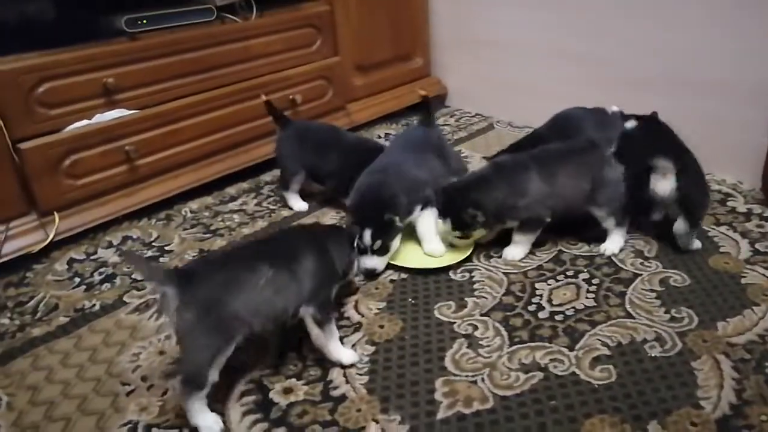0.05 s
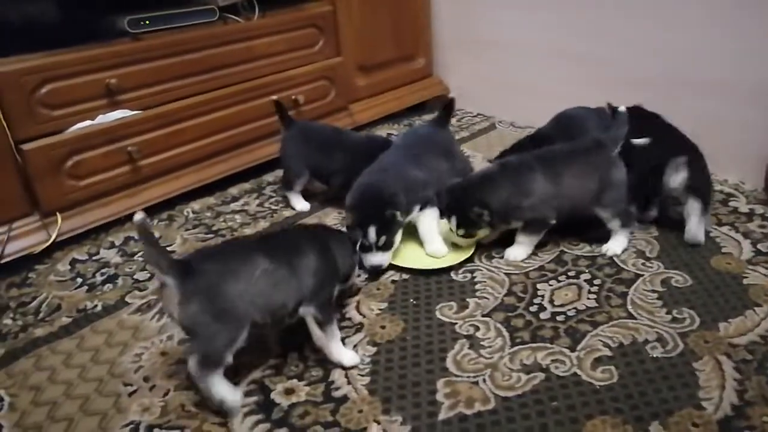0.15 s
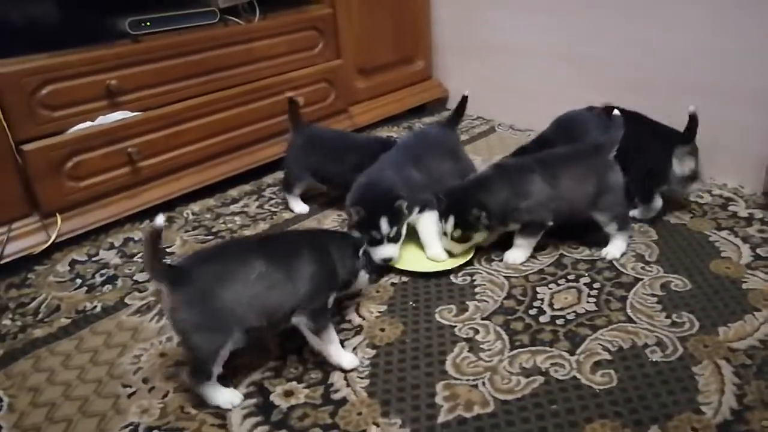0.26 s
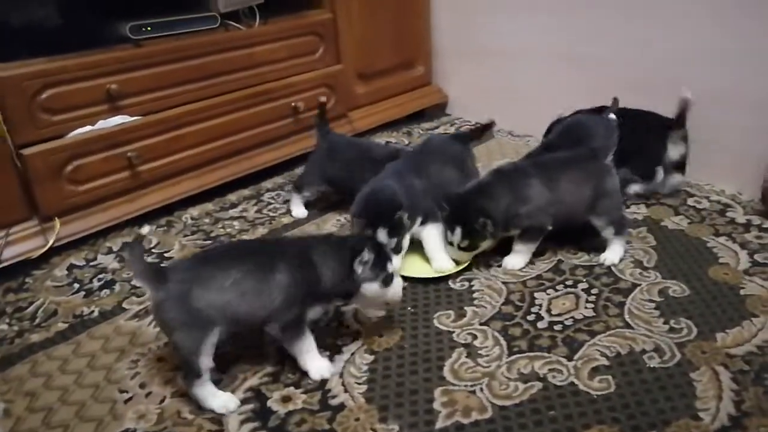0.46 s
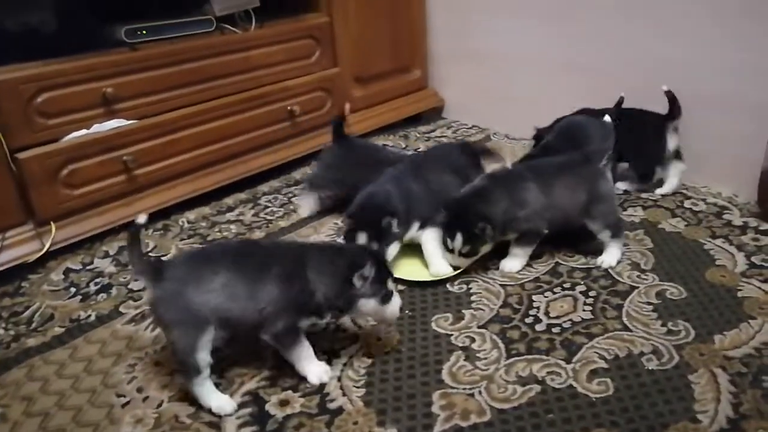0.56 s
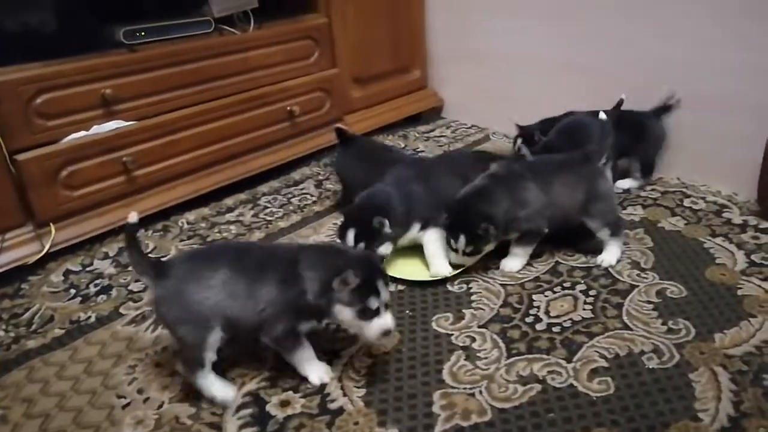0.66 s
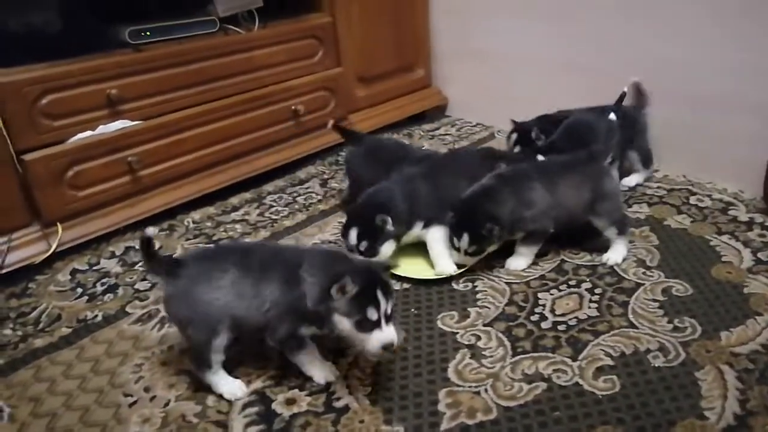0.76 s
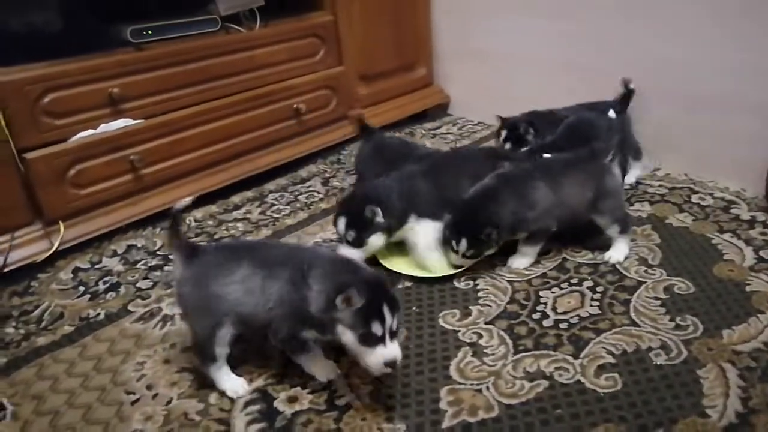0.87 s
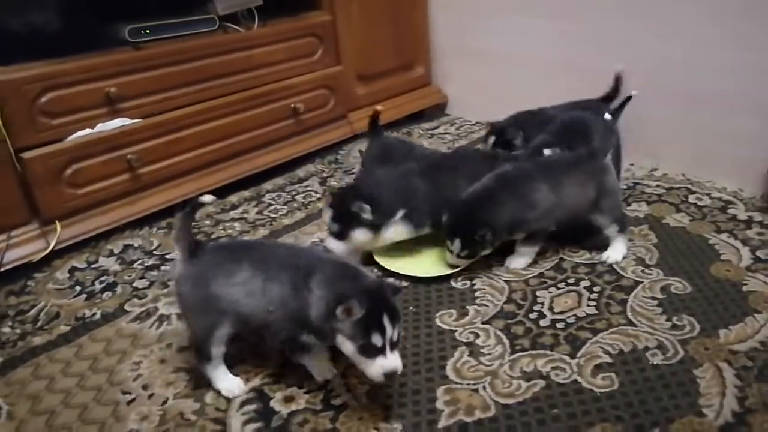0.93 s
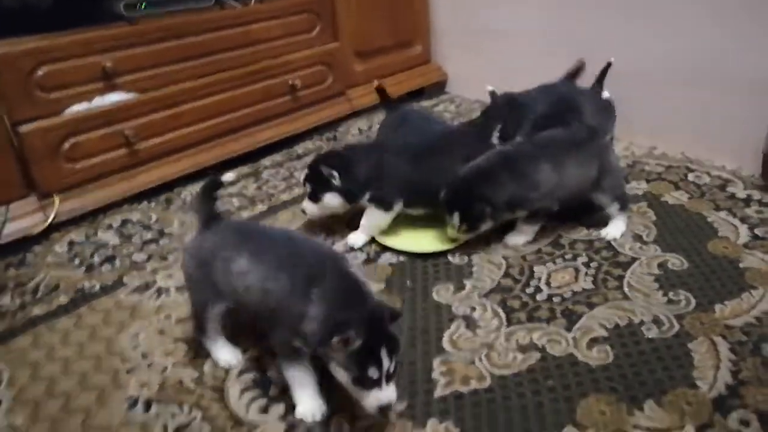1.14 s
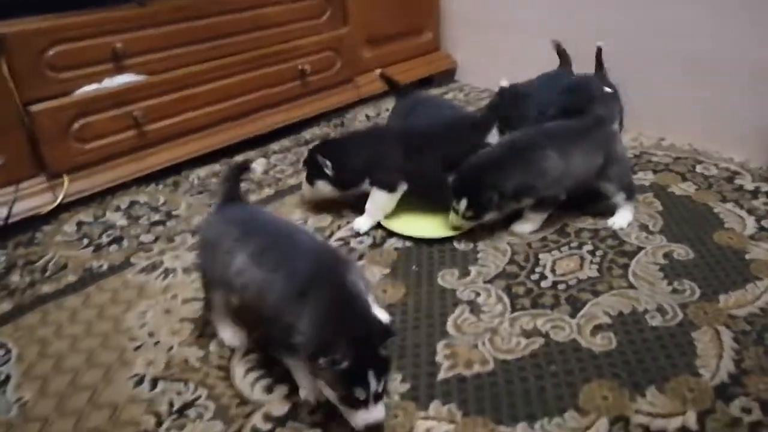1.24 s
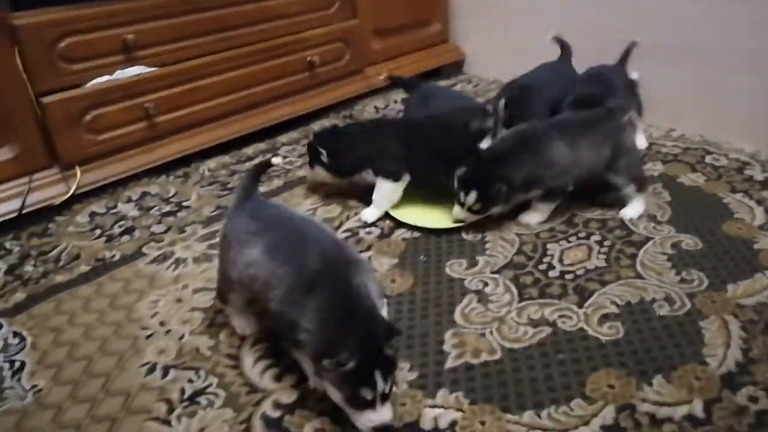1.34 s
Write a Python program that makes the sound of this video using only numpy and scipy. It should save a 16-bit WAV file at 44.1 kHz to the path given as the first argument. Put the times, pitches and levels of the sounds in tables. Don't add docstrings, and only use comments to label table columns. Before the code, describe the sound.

Several young puppies yap and whine close by in a small room: a quick rising yip, a loud shrill yap, another hoarse pair, then faint whimpers, with soft paw thumps and carpet scuffs over low hum.

```python
import sys
import numpy as np
from scipy import signal
from scipy.fft import rfft, irfft
from scipy.io import wavfile
from scipy.ndimage import uniform_filter1d, map_coordinates

SR = 44100
rng = np.random.default_rng(int(sys.argv[2]) if len(sys.argv) > 2 else 0)


def persist_wave(psi):
    counts = np.round(np.clip(psi, -1, 1) * 32767).astype(np.int16)
    wavfile.write(sys.argv[1], SR, np.atleast_2d(counts).T)


def how_loud(loudness_db):
    steps = np.asarray(loudness_db, float) / 20
    return 10 ** steps


N = 61739

# time in seconds, pitch in Hz, level in dB, roughness from 0 to 1.
YAP_1 = [(.172, 308.6, -53, 0.04), (.188, 404, -36.5, 0), (.197, 509, -36, 0), (.206, 710, -26.5, 0)]
YAP_2 = [(.205, 725.5, -22.5, 0.052), (.213, 742.6, -29.5, .05), (0.226, 774.5, -28, .04),
         (0.234, 842, -23, .04), (0.244, 850, -32.5, .06)]
YAP_2_UNDERTONE = [(.238, 275.5, -35.5, 0.46), (0.254, 279.2, -33.5, 0.64), (.268, 286.7, -34.5, 0.24),
                   (.285, 330, -48.5, .25), (0.346, 348.2, -49.5, .3), (0.401, 348, -50, 0.21)]
WHINE_1 = [(0.266, 342.5, -43.5, .05), (.275, 376, -36.5, .05), (.295, 435.5, -41.5, 0.06),
           (0.309, 534, -36.5, 0.065), (.322, 550, -30.5, 0.058), (0.343, 720, -25.5, .08)]
WHINE_1_END = [(0.346, 463, -42, .1), (0.356, 499.6, -36.5, .08), (0.37, 533.4, -37, .1),
               (0.386, 571.2, -31, 0.42), (0.401, 531, -33.5, .15)]
YAP_3 = [(.392, 943, -43, 0.036), (0.413, 1034, -22.5, 0.1), (0.434, 1146, -15.5, 0.49),
         (.445, 1216, -9.5, 0.22), (0.454, 1277, -10, 0.29), (0.463, 1378, -13.5, 0.15),
         (0.479, 1531, -16.5, 0.12), (0.496, 1346, -21, .04), (.508, 1437, -20.5, 0.058)]
YAP_4 = [(.693, 660, -55.5, 0.022), (.702, 719, -37, .02), (.712, 861, -43.5, .02),
         (0.73, 987.6, -33.5, .02), (0.743, 1113, -24.5, .02), (0.751, 1301, -17.5, .03),
         (.762, 1396, -21.5, 0.025), (0.774, 1455, -22, .03), (0.785, 1281, -19, .04)]
WHINE_2 = [(0.719, 558, -41, 0.5), (0.753, 617, -23.5, 1), (0.769, 645.3, -40.5, 0.31),
           (0.812, 647, -46.5, 1)]
YAP_5 = [(.775, 1197, -24.5, 0.35), (0.793, 1227, -12.5, 0.5), (0.811, 1279, -16, 0.75),
         (0.824, 1396, -16, 0.27), (0.839, 1505, -21.5, 0.39), (0.857, 1529, -21.5, 0.34),
         (.885, 1607, -38, .3)]
YAP_5_UNDERTONE = [(.755, 1006, -30, 0.24), (.785, 1006, -16.5, .25), (.812, 1106, -21.5, 0.58)]
YAP_6 = [(0.871, 1224, -30.5, .05), (0.882, 1175, -19.5, 0.035), (0.895, 1064, -27, 0.036),
         (0.916, 908, -38, 0.11)]
WHINE_3 = [(.965, 683, -66, 0.085), (0.976, 693.4, -44, .1), (1.03, 720.3, -56, 0.083),
           (1.091, 698, -69, .1)]
YAP_7 = [(1.225, 760.5, -41, 0.098), (1.245, 908.6, -36.5, 0.025), (1.27, 1017, -35, 0.025),
         (1.283, 1017, -44.5, 0.017), (1.304, 1029, -62, 0.046)]
WHINE_4 = [(1.259, 544, -51.5, 0.37), (1.292, 559, -44, 0.16), (1.332, 535, -64, 0.16)]
CALLS = [YAP_1, YAP_2, YAP_2_UNDERTONE, WHINE_1, YAP_3, YAP_4, WHINE_2, YAP_5, YAP_6,
         WHINE_3, YAP_7, WHINE_4, WHINE_1_END, YAP_5_UNDERTONE]
# overtones 2 to 6, each in dB against the call's level.
OVERTONES = [(-5, -10, -13.5, -11, -20), (-7, -8.5, 5, -12, -5), (-11, -4, -4.5, -8.5, -10.5),
             (-12.5, -20.5, -24.5, -30.5, -32.5), (-8.5, -17.5, -20.5, -21.5, -27.5),
             (-21, -4.5, -10, -18, -16.5), (-9.5, 6.5, 7.5, -8, -19.5), (-6, -28, -15.5, -22, -41),
             (-15.5, -12, -19, -46.5, -37), (-20, -9.5, -59, -41, -46), (0.5, -27.5, -22, -19, -15),
             (-5, -9.5, -28, -37, -28), (2.5, -15, -24, -30, -29), (-23.5, -22, -24.5, -32, -39)]
# level of the lowest tone in dB, half-pitch share from 0 up,
# left over right in dB, lag of the left side in seconds, level sent into the room in dB.
PLACES = [(2, 0, -2.5, 0.000089, -10), (-4, 0.1, 0.5, 0.000037, -3), (-54.5, 0.3, 5, 0.000025, -2),
          (-1, 0.5, -0.3, 0.0001, -9.5), (-1.73, 1.25, 6, 0.00022, -10), (2.5, 0.05, 2.5, 0.000282, -4.5),
          (-3, .05, -2.5, 0.00018, -11.5), (-7.5, 0.25, -0.5, 0.00025, -5.5), (-3, 0.6, -2.5, 0.00018, -12),
          (-3, 0, -1, 0.0001, -3), (0, 0, 3, 0.000052, -6), (-12.5, 0.46, 4, 0.000036, -16),
          (-6, 0.2, 0.5, 0.00012, -4.5), (-3.5, .05, -3, 0.00017, -11)]
# bright resonance in Hz, its width in octaves, its lift in dB, dark notch in Hz.
THROATS = [(3994, .3, -2.5, 2400), (3870, 0.92, 3.5, 2890), (1350, 0.28, 7, 2080), (4000, .3, -7, 1600),
           (4747, 0.12, 13.5, 2260), (4140, 0.46, 4.5, 2250), (4280, .3, 0.5, 1870),
           (3060, 0.063, 2.5, 2100), (3170, 0.3, 14, 2700), (4000, .3, -1, 2240), (4600, 0.23, 7, 2140),
           (4000, .3, -4, 2000), (4000, .3, 1, 2200), (4300, 0.27, 2, 2100)]
# start in seconds, level in dB, pitch in Hz, time to fall 60 dB in seconds.
THUMPS = [(0.019, -39.5, 62.8, 0.13), (0.034, -26.5, 224, 0.037), (0.329, -33, 67.4, 0.092),
          (0.39, -39, 115, 0.064), (0.672, -46, 69.7, 0.24), (0.73, -22, 73.4, 0.029),
          (0.991, -51, 63.6, 0.51), (1.039, -43, 65.8, 0.12), (1.067, -28.5, 150.4, 0.072),
          (1.153, -39, 74.8, 0.2), (1.212, -45.5, 167, 0.11), (1.271, -46, 53.1, 0.14)]
# start in seconds, length in seconds, level in dB.
SCUFFS = [
    (.004, 0.048, -51),
    (0.285, 0.32, -52.5),
    (0.53, 0.12, -46.5),
    (1.002, 0.082, -65.5),
    (1.146, 0.046, -55.5),
    (0.644, 0.14, -89),
]
# start in seconds, length in seconds, level in dB.
PANTING = [
    (0.208, 0.15, -59),
    (0.303, 0.12, -62),
    (0.411, .17, -58.5),
    (1.118, .06, -73.5),
]
# frequency in Hz, level in dB per Hz.
SCUFF_COLOUR = [(110, -9), (220, 2.5), (700, 6.5), (1500, -10.5), (3000, -16), (7000, -34.5), (13000, -32)]
# frequency in Hz, level in dB per Hz.
HOUSE_COLOUR = [(18, -41), (30, 4), (241, -25), (577, -30), (1020, -51), (1220, -26.5), (2260, -31.5),
                (3870, -41.5), (14000, -45)]
# delay in seconds, level in dB, left over right in dB.
MIRRORS = [
    (.0021, -16, 8.5),
    (.0063, -14, 2.5),
    (0.0128, -17, -0.5),
]


def walk(rate):
    k = max(int(SR / rate), 1)
    steps = np.repeat(rng.standard_normal(N // k + 1), k)[:N]
    smooth = uniform_filter1d(uniform_filter1d(steps, k), k)
    return smooth / smooth.std()


def coloured(points):
    hz, db = np.array(points).T
    f = np.fft.rfftfreq(N, 1 / SR) + 1
    shape = how_loud(np.interp(np.log(f), np.log(hz), db, left=-50))
    noise = irfft(rfft(rng.standard_normal(N)) * shape, N)
    return noise / noise.std()


def house():
    hum_db, whistle_db, whistle_hz = -55.5, -74.5, 2190
    mid = coloured(HOUSE_COLOUR)
    side = signal.lfilter(*signal.butter(1, 200, "high", fs=SR), coloured(HOUSE_COLOUR))
    whistle = coloured([(whistle_hz * .9, -30), (whistle_hz, 0), (whistle_hz * 1.1, -30), (6000, -70)])
    hum = how_loud(hum_db + 0.32 * walk(22)) * (mid + side * np.array([[1], [-1]]))
    return hum + how_loud(whistle_db + 3.8 * walk(5.3)) * whistle


def room():
    low_t60_s, treble_t60_s, treble_db, gap_s = 0.42, 0.94, -11, 0.0048
    t = np.arange(int(SR * .75)) / SR
    noise = rng.standard_normal((2, len(t)))
    low = signal.lfilter(*signal.butter(2, 2400, fs=SR), noise)
    tail = low * how_loud(-60 * t / low_t60_s) + (noise - low) * how_loud(treble_db - 60 * t / treble_t60_s)
    tail = tail * np.exp(-t / 0.055)
    tail = tail * np.clip(t / gap_s - 1, 0, 1)
    return tail / np.sqrt(np.sum(tail ** 2, axis=1, keepdims=True))


def paws():
    t = np.arange(N) / SR
    thump = 0
    for start, db, hz, t60 in THUMPS:
        since = np.maximum(t - start, 0)
        soft_start = 1 - np.exp(-since / 0.018)
        thump = thump + how_loud(db - 60 * since / t60) * soft_start * 2 * np.sin(2 * np.pi * hz * since)
    rub, hiss = 0, 0
    for start, length, db in SCUFFS:
        rub = rub + how_loud(db) * np.sin(np.pi * np.clip((t - start) / length, 0, 1) ** 0.5) ** 2
    for start, length, db in PANTING:
        hiss = hiss + how_loud(db) * np.sin(np.pi * np.clip((t - start) / length, 0, 1)) ** 2
    breath_hiss = hiss * coloured([(3000, -24), (7000, -0.5), (10500, 1), (13000, -6.5), (15000, -12)])
    grain = how_loud(2.5 * walk(130))
    return thump, (rub * coloured(SCUFF_COLOUR) + breath_hiss) * grain


def bump(hz, centre_hz, width_oct):
    return np.exp(-.5 * (np.log2(hz / centre_hz) / width_oct) ** 2)


def voice(curve, overtones, first_db, half, throat):
    edge_s, jitter, shimmer_db, breath_db = .004, .006, 1.2, -14
    high_slope_db, top_slope_db, top_from_hz = -4.5, -15, 4120
    bloom_db, bloom_s = -14, .012
    hoarse_hz = 270
    ring_hz, ring_oct, ring_db, notch_hz = throat
    c = np.array(curve).T
    first_s, last_s = c[0, 0], c[0, -1]
    on = slice(int((first_s - edge_s) * SR), int((last_s + edge_s) * SR))
    t = np.arange(N)[on] / SR
    pitch, db, rough = (np.interp(t, c[0], v) for v in c[1:])
    rough = np.clip(rough, 0, 1)
    phase = 2 * np.pi * np.cumsum(pitch * (1 + jitter * walk(90)[on])) / SR
    gate = np.clip(np.minimum(t - first_s, last_s - t) / edge_s + .5, 0, 1)
    half = half * (rough + 0.06) / (rough.max() + 0.011)
    known = [first_db, *overtones]
    buzz = 0
    for k in range(1, 25):
        hz = k * pitch
        part_db = known[min(k, len(known)) - 1] + high_slope_db * np.log2(max(k / len(known), 1))
        part_db = part_db + top_slope_db * np.log2(np.maximum(hz / top_from_hz, 1))
        part_db = part_db - 11.5 * bump(hz, notch_hz, 0.26)
        part_db = part_db + ring_db * bump(hz, ring_hz, ring_oct)
        bloom = np.exp(-(t - t[0]) / bloom_s)
        part_db = part_db + bloom_db * bloom * np.log2(np.maximum(hz / 1200, 1))
        r = rough if k > 1 else rough / 3
        wobble_hz = hoarse_hz * np.sqrt(k) / 2
        slow = signal.butter(3, wobble_hz, fs=SR, output="sos")
        a, b = signal.sosfilt(slow, rng.standard_normal((2, len(t)))) * np.sqrt(SR / 2 / wobble_hz)
        tone = (np.sqrt(2 - 2 * r) + np.sqrt(r) * a) * np.sin(k * phase)
        tone = tone + np.sqrt(r) * b * np.cos(k * phase)
        strong_weak = 1 + half * (k > 1) * np.sin(phase / 2)
        buzz = buzz + tone * how_loud(part_db) * strong_weak * (hz < .4 * SR)
    buzz = (buzz + half * 0.22 * np.sin(3 * phase / 2)) * how_loud(shimmer_db * walk(70.3)[on])
    breath = coloured([(700, -21.5), (1200, -33.5), (2600, -19.5), (4500, -2.5), (7000, -16.5), (14000, -58)])
    puffs = np.sqrt(rough) * breath[on] * (1 + np.sin(phase))
    whole = np.zeros(N)
    whole[on] = (buzz + how_loud(breath_db) * puffs) * how_loud(db) * gate
    return whole


def scene():
    n = np.arange(N)
    opposite = np.array([[1], [-1]])
    thump, scuff = paws()
    direct = np.zeros((2, N))
    to_room = 0.97 * scuff + 0.24 * thump
    for curve, overtones, place, throat in zip(CALLS, OVERTONES, PLACES, THROATS):
        first_db, half, pan_db, lag, room_db = place
        call = voice(curve, overtones, first_db, half, throat)
        late = map_coordinates(call, [n - lag * SR], order=3)
        direct = direct + [late * how_loud(pan_db / 2), call * how_loud(-pan_db / 2)]
        to_room = to_room + call * how_loud(room_db)
    dull = signal.sosfilt(signal.butter(3, 2200, fs=SR, output="sos"), direct)
    mirrored = 0
    for delay, db, pan_db in MIRRORS:
        copy = np.array([map_coordinates(c, [n - delay * SR], order=1) for c in dull])
        mirrored = mirrored + copy * how_loud(db + pan_db * opposite / 2)
    echo = signal.fftconvolve(to_room[None], room(), axes=1)[:, :N]
    side = signal.lfilter(*signal.butter(1, 596, "high", fs=SR), echo[1])
    return direct + mirrored + echo[0] + side * opposite + thump + scuff + house()


def low_pass(x):
    return signal.sosfilt(signal.butter(12, 15000, fs=SR, output="sos"), x)


def record(dry):
    dull = signal.sosfilt(signal.butter(2, [45, 9000], "band", fs=SR, output="sos"), dry)
    mix = np.tanh(0.61 * dull) / 0.61
    return low_pass(mix)


dry = scene()
out = record(dry)
persist_wave(out)
```